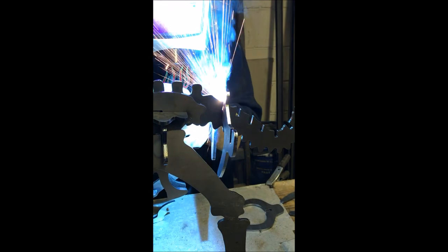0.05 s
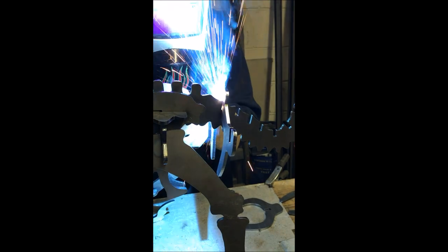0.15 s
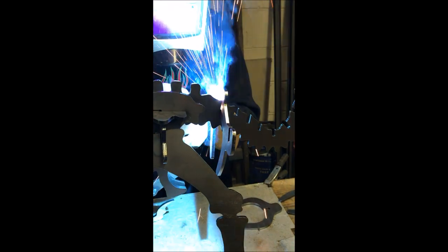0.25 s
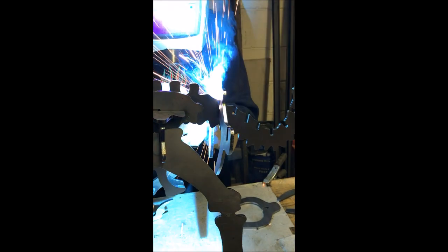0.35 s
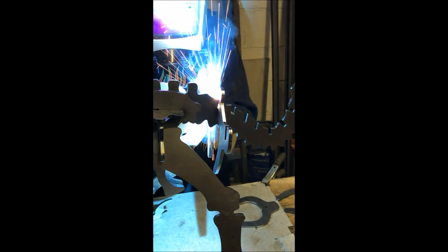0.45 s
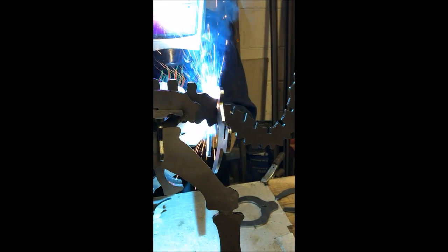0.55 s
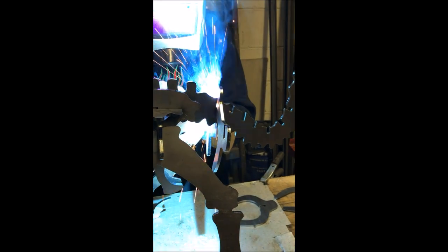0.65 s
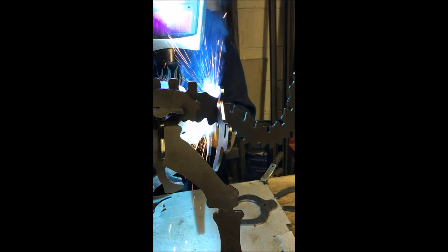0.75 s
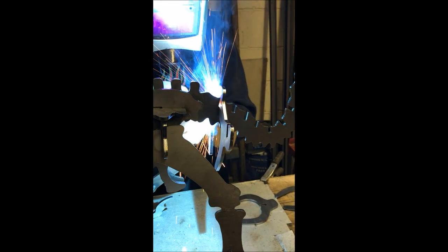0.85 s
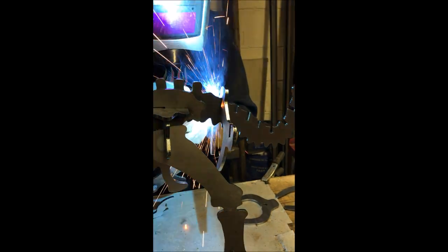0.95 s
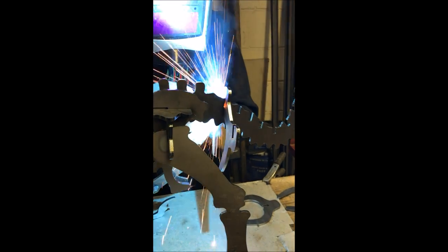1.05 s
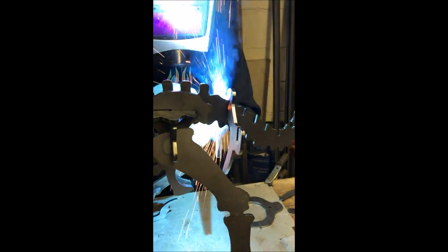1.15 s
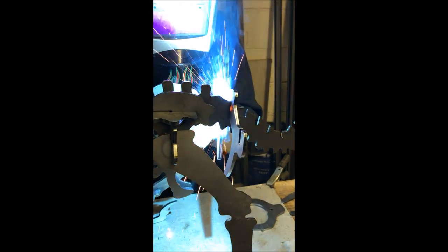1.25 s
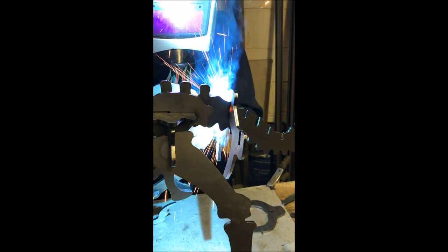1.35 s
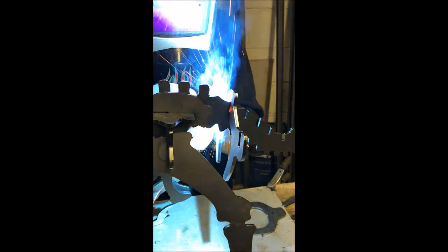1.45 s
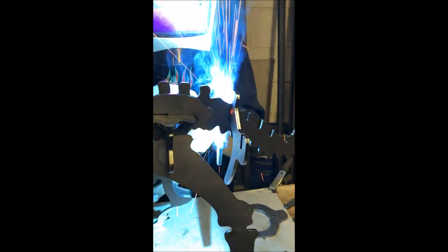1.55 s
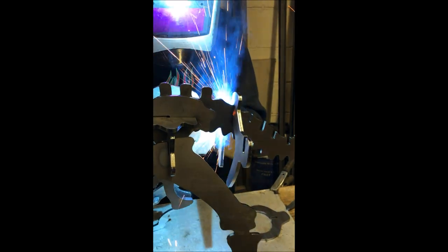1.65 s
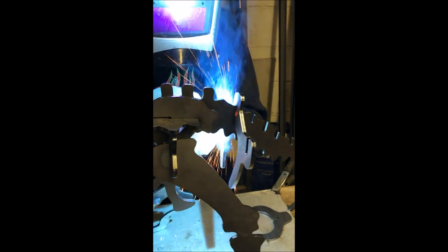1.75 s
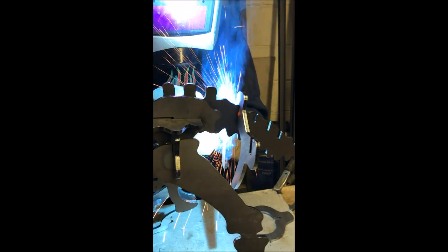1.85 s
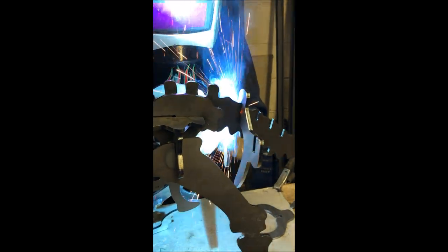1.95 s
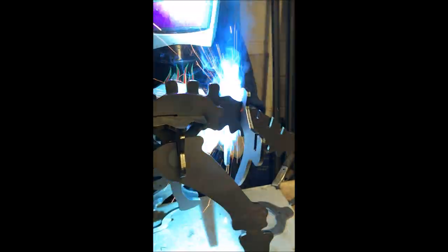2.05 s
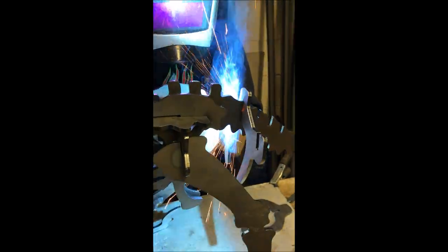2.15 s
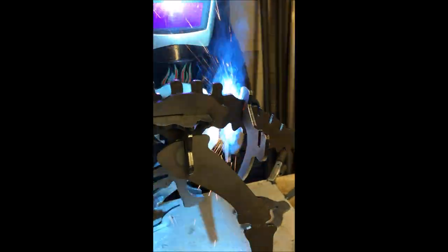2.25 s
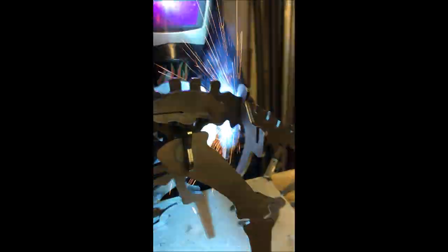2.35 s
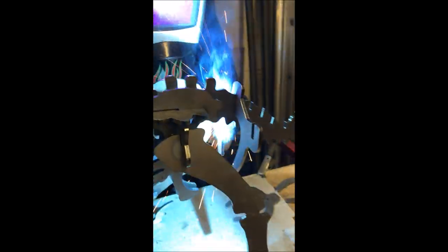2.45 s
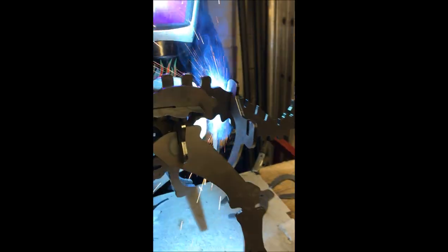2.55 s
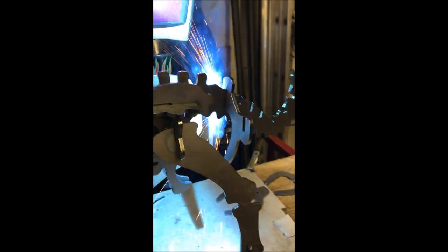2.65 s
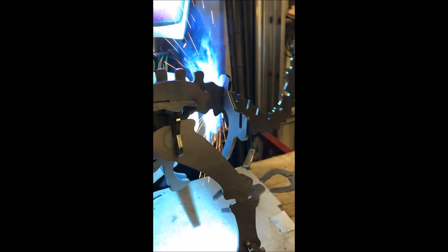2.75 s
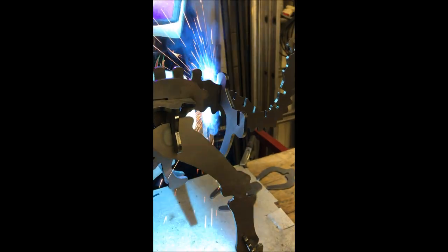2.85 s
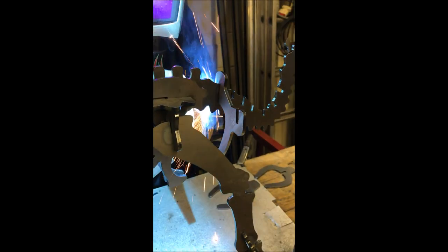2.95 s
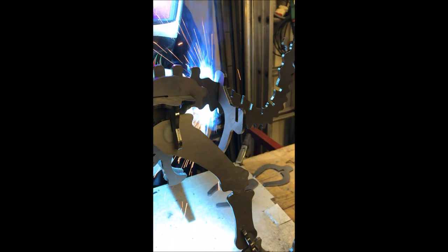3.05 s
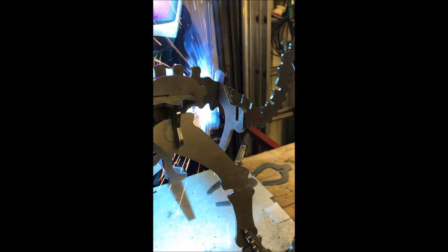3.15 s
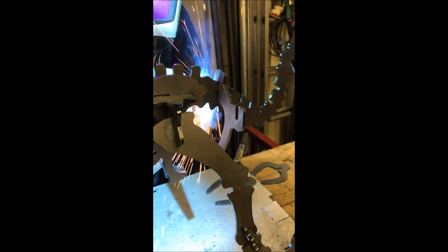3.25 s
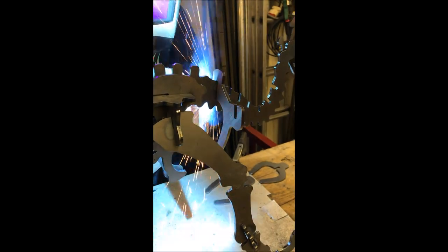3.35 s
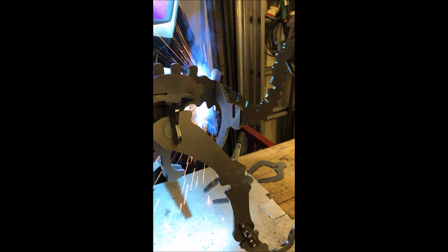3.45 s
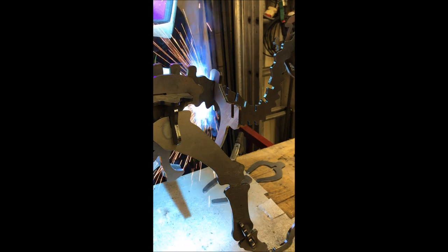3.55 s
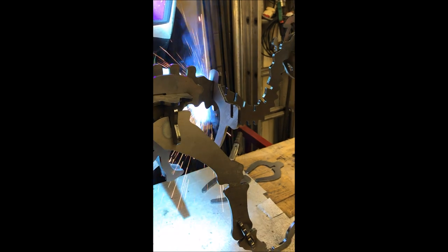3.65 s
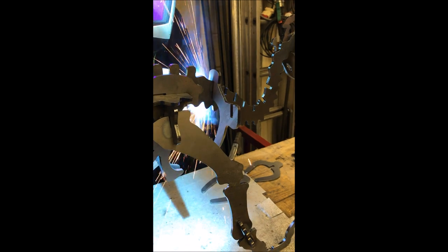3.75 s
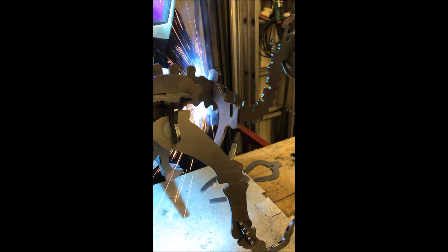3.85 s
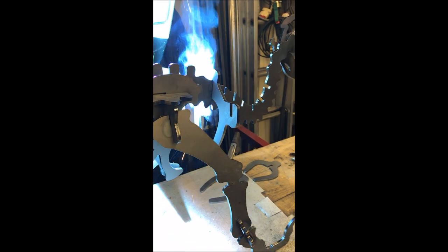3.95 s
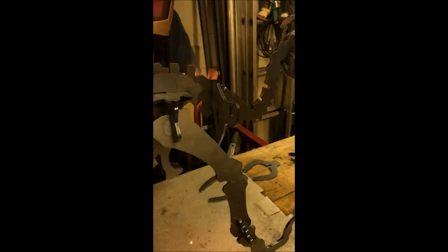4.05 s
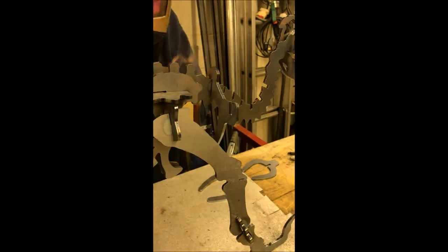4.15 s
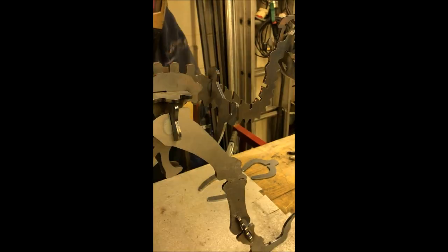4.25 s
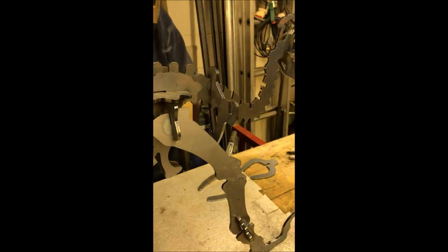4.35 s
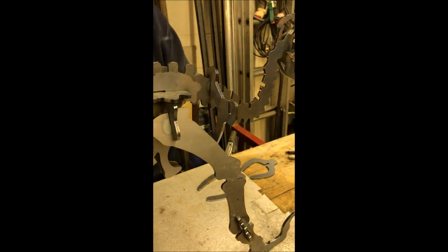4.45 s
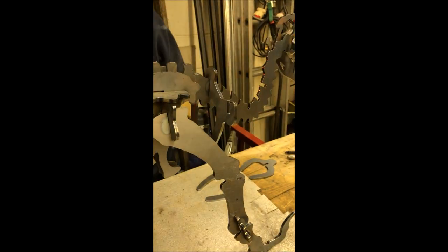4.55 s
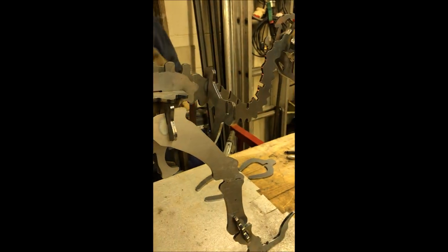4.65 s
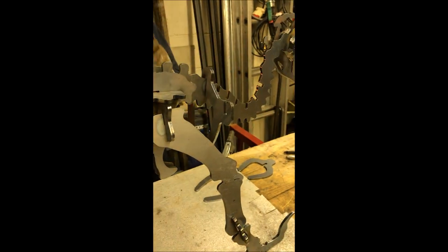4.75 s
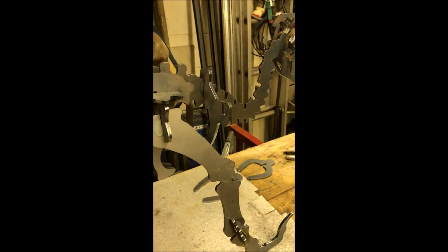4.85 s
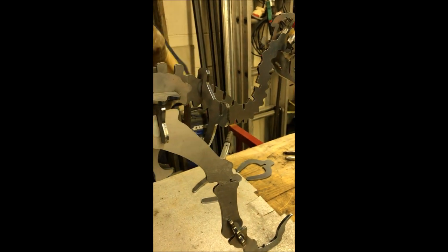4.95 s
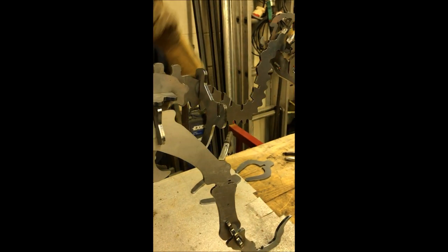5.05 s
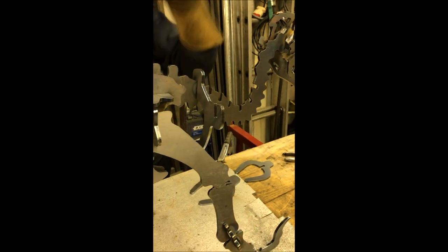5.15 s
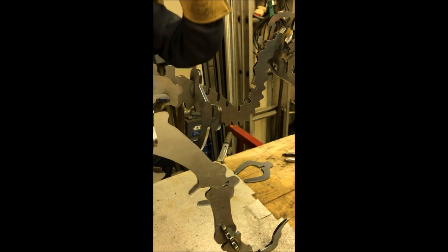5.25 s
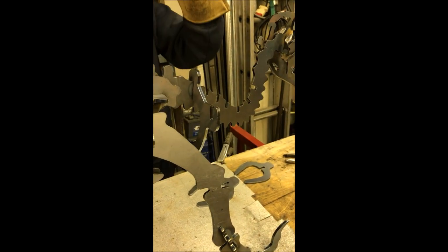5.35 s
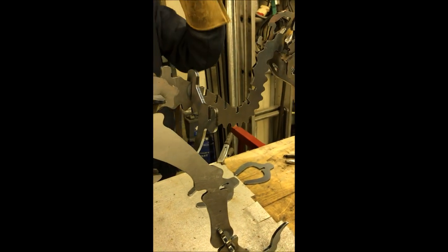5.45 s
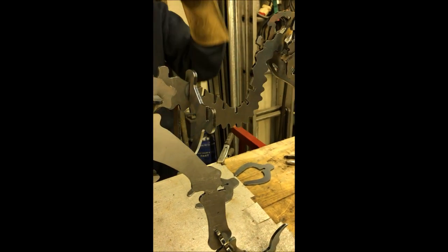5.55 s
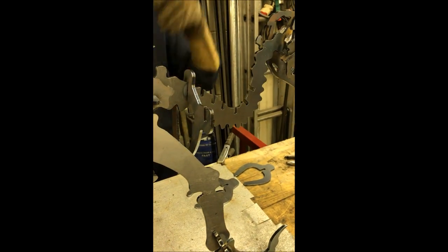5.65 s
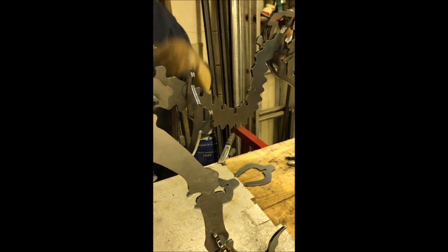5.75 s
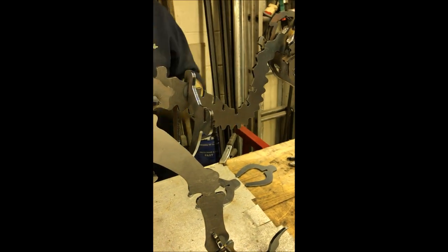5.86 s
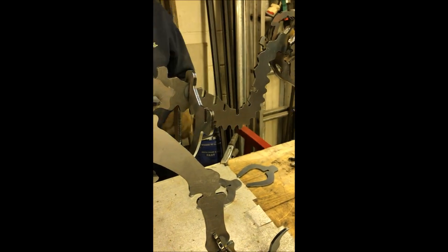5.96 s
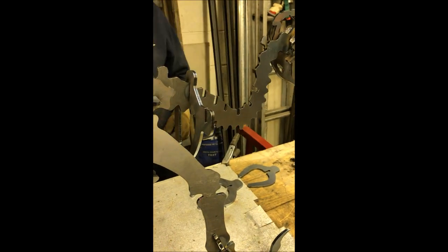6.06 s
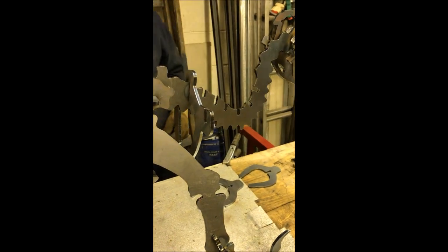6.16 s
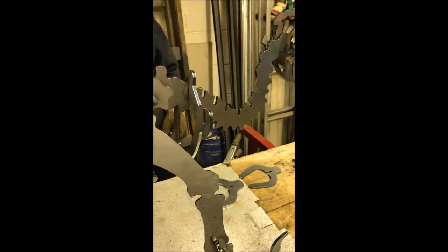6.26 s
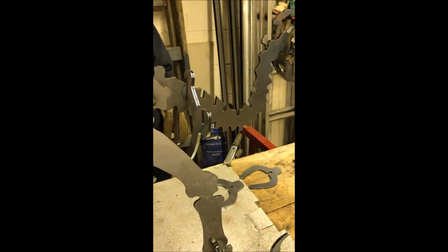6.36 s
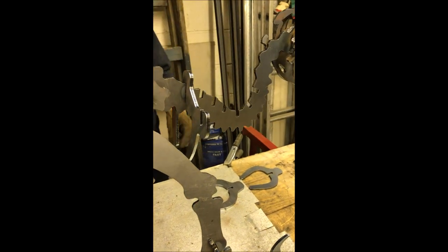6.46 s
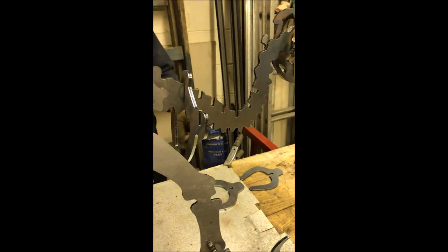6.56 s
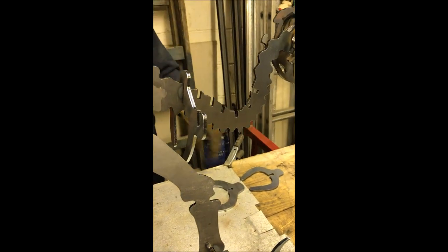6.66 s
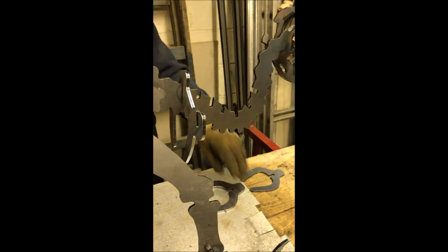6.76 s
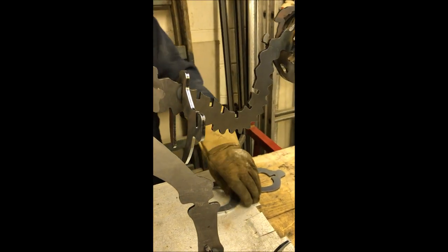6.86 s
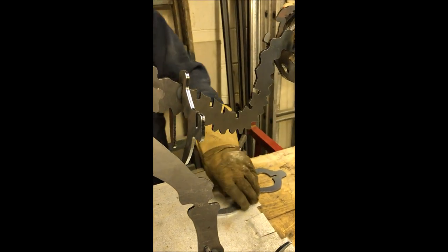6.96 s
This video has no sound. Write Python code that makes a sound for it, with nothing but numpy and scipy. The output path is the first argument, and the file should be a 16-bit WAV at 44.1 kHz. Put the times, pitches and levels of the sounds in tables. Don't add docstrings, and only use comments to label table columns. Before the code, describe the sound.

Loud, buzzing, sputtering arc weld on steel in a small workshop cuts off abruptly, then faint rustling, ratchety helmet clicks and a final knock.

```python
import sys
import numpy as np
from scipy import signal
from scipy.fft import rfft, irfft, dct, next_fast_len
from scipy.io import wavfile
from scipy.ndimage import uniform_filter1d

SR = 44100
rng = np.random.default_rng(int(sys.argv[2]) if len(sys.argv) > 2 else 0)


def to_wav(sig):
    pcm = np.clip(np.atleast_2d(sig), -1, 1) * 32767
    pcm = np.round(pcm).astype(np.int16)
    wavfile.write(sys.argv[1], SR, pcm.T)


def nominal_scale(level):
    x = np.asarray(level, float) / 20
    return 10 ** x


N = 308459

# f/Hz, density/dB per Hz
SHOP_SPECTRUM = [(240, -33.5), (400, -5.5), (921, -5.5), (1310, -12.5), (1560, -15.5), (7510, -34.5),
                 (12300, -24.5), (16000, -34)]
SHOP_DB = -62.5
# f/Hz, width/Hz, level/dB
FAN_BANDS = [(59, 8, -58), (78, 14, -56.5), (104.8, 14, -65), (188, 21, -53), (255, 81, -65.5),
             (335, 29, -60)]
# f/Hz, T60/s
ROOM_T60 = [(200, .6), (1000, 0.35), (4000, 0.35), (9000, .35), (15000, .25)]
# t/s, level/dB, top octave re level/dB
RUSTLE_CURVE = [(4.2, -53, -10), (4.35, -62, -6), (4.48, -60, -6), (4.54, -57.5, -10), (4.61, -59, -7),
                (4.66, -75, -6.5), (4.9, -72, -4), (4.94, -67, -3), (5.1, -69, -6), (5.14, -62, -13),
                (5.2, -66, -12), (5.45, -62.5, -8), (5.55, -77.5, -3.5), (6.88, -80, -6), (6.92, -65, -8),
                (6.972, -63.5, -8), (6.982, -51, -5), (6.987, -36, -9), (6.995, -37, -6)]
# t/s, level/dB
SQUEAK_CURVE = [
    (4.37, -78),
    (4.38, -56),
    (4.42, -56),
    (4.44, -68),
    (4.47, -80),
]
# f/Hz, width/Hz, level/dB
SQUEAK_BANDS = [(2900, 300, -2), (4370, 250, 3), (8000, 900, -3), (13400, 900, 1)]
# t/s, peak/dB, shell re peak/dB
HINGE_NOTCHES = [(5.2126, -47, -2), (5.2407, -41, 0), (5.2485, -35.5, -9), (5.2877, -42, -2.5),
                 (5.2964, -43.5, -1), (5.3173, -40.5, -11), (5.3277, -38, -7), (5.3667, -34, -4),
                 (5.4023, -30, -11), (5.435, -37.5, -14.5), (6.9481, -50, 3.5), (6.9834, -31.5, -8),
                 (6.9884, -29, -2)]
# f/Hz, level/dB, T60/s
SHELL_MODES = [(378, 2, 0.052), (633, -1, .04), (806, 2, 0.048), (1000, -1.5, 0.045)]
# f/Hz, level/dB, T60/s
PAWL_MODES = [(1436, -4, .012), (2225, 1, .012), (2890, -1.5, 0.015), (3600, -2, .01), (4280, -3, 0.0089),
              (5400, -5, 0.0062)]
# t/s, peak/dB
COOLING_TICKS = [
    (4.93, -71.5),
    (5.49, -69.5),
    (6.41, -72),
    (6.607, -72),
    (6.74, -69.5),
]
# f/Hz, level/dB, T60/s
STEEL_MODES = [(4500, -3, .12), (6100, 1, 0.27), (7900, 0, .1), (8300, 0, 0.23), (10200, -1, 0.104),
               (13000, -2, 0.11)]
# f/Hz, width/Hz, level/dB
HUM_BANDS = [(99, 7, -52.5), (198.6, 6, -45), (301, 6.4, -57), (665.5, 29, -43.5)]
# t/s, frying level/dB, hot-air thud level/dB
ARC_CURVE = [
    (0.0, -25, -41.5),
    (0.55, -28, -43),
    (1.25, -26.5, -50.5),
    (1.37, -25.5, -42),
    (3.58, -27.5, -56.5),
    (3.65, -27.5, -35),
    (4.07, -26, -53),
]
# f/Hz, density/dB per Hz
FRYING_SPECTRUM = [(120, -33.5), (200, -3.5), (360, -7), (1500, -3), (2290, -20), (2910, -6), (10500, -7.5),
                   (11700, -4.5), (16000, -7.5)]
RIPPLE_HZ = 99.9
# t/s, peak/dB
RESTRIKES = [(0.0049, -1), (0.0257, -4), (0.0359, -3), (0.0463, -2), (0.0493, 0), (0.0564, -3), (0.067, -2),
             (0.0773, 0), (0.081, -5), (0.089, -6), (0.0976, -4), (0.1159, -3), (0.127, -2.5), (0.1483, -8),
             (0.1567, -2), (0.1679, 2), (0.1767, -2.5), (0.1864, 2), (0.1987, -11.5), (0.2066, -3.5),
             (0.2178, 0), (0.2299, -4), (0.2572, -1.5), (0.2677, 1), (0.2752, -4), (0.2996, -4),
             (0.3065, -2.5), (0.3178, 1.5), (0.3277, -3.5), (0.3362, -3), (0.3474, -2), (0.358, -1),
             (0.367, -1.5), (0.3894, 3.5), (0.3947, -8), (0.4182, -6), (0.4286, -2), (0.4367, -1),
             (0.4475, 1.5), (0.4573, -5.5), (0.4665, -2), (0.4803, 4), (0.5079, -2), (0.5191, -4.5),
             (0.5272, 3), (0.5371, -2), (0.5475, -7.5), (0.5576, -6), (0.5681, 5), (0.5777, -6),
             (0.5871, -15), (0.5968, -7), (0.6073, 1.5), (0.6172, -9), (0.6264, -4), (0.6369, -3),
             (0.6471, -9), (0.6563, -10), (0.6671, -2), (0.6773, -6), (0.6856, -6), (0.6971, -2),
             (0.7076, -2), (0.7174, -4), (0.7275, -6), (0.7385, -0.5), (0.7475, -9), (0.7567, -4),
             (0.7674, -7), (0.778, -12), (0.7972, 0.5), (0.8086, -1), (0.8168, -7), (0.8271, 0),
             (0.8384, 1), (0.8483, -1), (0.8575, -2), (0.8686, -2), (0.8782, 0), (0.8884, -5), (0.9181, -2),
             (0.9667, 0.5), (0.9784, -3), (0.9884, -1), (0.9983, -2), (1.0094, -9), (1.0186, -7),
             (1.0268, 2), (1.0402, -10), (1.0509, -4), (1.0582, 6), (1.0777, -5), (1.1005, 0), (1.1076, 2),
             (1.1185, -2), (1.1503, 0), (1.1595, -0.5), (1.1686, -3), (1.1982, -7), (1.2085, 1),
             (1.2185, -1), (1.2403, -2), (1.2583, 2), (1.2778, -1.5), (1.2983, -11), (1.3097, -4),
             (1.3189, -8), (1.3289, -4), (1.3388, -4.5), (1.3571, -2), (1.3797, -8), (1.39, 1), (1.3999, 0),
             (1.4077, -2), (1.4183, -5), (1.4287, -4), (1.4486, -2), (1.4712, 3), (1.4982, -1),
             (1.5086, -7), (1.5183, -2), (1.5287, -9), (1.5482, -3), (1.5696, 1), (1.5807, -3), (1.5987, 3),
             (1.6084, -9), (1.618, -8), (1.6297, -2), (1.6389, -4), (1.6482, -9), (1.6606, 0), (1.6702, -6),
             (1.6863, 4.5), (1.699, -4), (1.7077, -2), (1.7187, -4), (1.7293, 0), (1.7397, -5),
             (1.7495, -4), (1.759, -0.5), (1.769, 0), (1.779, -6), (1.783, -5), (1.7891, -2), (1.8079, -3),
             (1.8195, 3), (1.8283, -6), (1.8394, -1), (1.8499, -5), (1.9016, -2), (1.909, -5),
             (1.9194, 0.5), (1.9293, -6), (1.9484, -2), (1.9594, -5), (1.9796, -3), (1.9901, 0),
             (1.9985, -5), (2.011, 0), (2.0398, 1), (2.0508, -1), (2.0588, 0), (2.0784, -6), (2.0828, -6),
             (2.089, 1), (2.0993, -7), (2.1106, -1), (2.1177, -1), (2.1215, -8), (2.1294, -4), (2.1409, -6),
             (2.1529, -7), (2.1628, 0), (2.1761, -12), (2.1787, 0), (2.2008, -7), (2.2163, -4),
             (2.2317, -3), (2.2404, 2), (2.2506, -4), (2.2601, -3), (2.2709, -1), (2.2823, -4),
             (2.2908, -6), (2.3012, -1), (2.304, -5), (2.3094, 1), (2.3182, -3), (2.3298, 1), (2.3408, -9),
             (2.3504, 1.5), (2.3805, -3), (2.4071, -5.5), (2.4297, -5), (2.4415, -3), (2.4691, -11),
             (2.4795, 0), (2.4906, -7), (2.5008, -7), (2.5114, 1), (2.5205, -1), (2.5684, -4), (2.5782, -4),
             (2.5891, -6), (2.5993, -5), (2.6081, -4), (2.6112, -5), (2.6196, 1), (2.6304, -3),
             (2.6395, -5.5), (2.6595, -3), (2.684, -1), (2.6896, -1), (2.7011, -3), (2.7091, -1),
             (2.7295, -3), (2.7793, -2), (2.7992, -3.5), (2.81, 1), (2.8207, -8), (2.8313, -4),
             (2.8418, -3), (2.8779, 0.5), (2.901, -0.5), (2.9106, 0), (2.9207, -1), (2.9407, -10),
             (2.9517, 1), (2.9605, -3), (2.9704, -3), (2.9799, -14), (2.9995, 0), (3.0095, 0.5), (3.02, -7),
             (3.0303, -7), (3.041, 2), (3.0505, -10), (3.0606, -5), (3.0707, -2), (3.0808, -2),
             (3.0908, -5), (3.1002, 1), (3.1044, -12), (3.1196, -11), (3.1236, 4), (3.1303, 0),
             (3.1392, -2), (3.1441, -8), (3.159, -3), (3.1696, -2), (3.1906, -3), (3.1993, -6),
             (3.2098, -5), (3.2197, 0), (3.2297, -7), (3.24, -4.5), (3.2503, -3), (3.2801, -5.5),
             (3.2902, -7), (3.3, 2.5), (3.3199, -8), (3.3241, 0.5), (3.3315, -4), (3.3411, -3.5),
             (3.3514, -2), (3.3618, -2), (3.3712, -4), (3.3811, -5), (3.3912, 1), (3.4098, -3.5),
             (3.4137, -7), (3.4205, -1.5), (3.4312, -3), (3.451, -3), (3.4614, -6), (3.471, -2),
             (3.4811, -6), (3.502, -3), (3.5115, -4), (3.5312, -7), (3.5408, -5), (3.5513, -1.5),
             (3.5613, 0.5), (3.5648, -3), (3.5713, -7), (3.6113, -4.5), (3.621, -2), (3.6447, -9),
             (3.6515, -12.5), (3.662, 2), (3.6718, -3), (3.6819, 3), (3.701, 1), (3.7109, -4), (3.7221, -2),
             (3.7303, -15), (3.7407, -4), (3.7516, -2.5), (3.7606, -5), (3.7709, -12), (3.7814, -9),
             (3.7914, -1), (3.8023, -9), (3.8095, -5), (3.8204, -4.5), (3.8302, -12), (3.8412, -4.5),
             (3.8511, -8), (3.8606, -9), (3.8812, -4.5), (3.8909, -7.5), (3.9018, 4), (3.9249, -6),
             (3.9379, -5), (3.9526, -1), (3.9618, 2), (3.9725, -2), (3.9815, -6), (3.991, -4), (4.0435, -4),
             (4.0563, -4)]
SPATTER_COUNT = 90
TORCH_S = [0, 2.2, 4.05]
# delay/ms at start, middle, end; level/dB at start, middle, end
PLATE_ECHOES = [(.34, .34, .32, -26, -5, -7), (.55, .54, 0.55, -21.5, -8, -17),
                (.66, 0.6325, .59, -11, -9.5, -2), (.71, .68, .63, -6.5, 1, -16),
                (.79, 0.774, .70, -3, -4, 3), (.95, 0.9215, .85, -15.5, -14, -3.5),
                (1.11, 0.86, 0.92, -18.5, -16.5, -27), (1.42, 1.3466, 1.29, -7.5, -3.5, -1),
                (1.46, 1.47, 1.3, -14, -11, -13), (2.05, 2.2, 1.9, -15, -17, -11),
                (2.6, 2.8, 2.7, -21, -19.5, -19)]
# f/Hz, width/Hz, gain/dB
PORT_BANDS = [(11720, 900, 4), (13100, 900, 3.5), (10340, 900, -5), (15800, 600, 3)]
# t/s, share of bands lost, length/s
THIN_FRAMES = [(0.048, .5, 0.035), (0.239, 0.48, 0.043), (0.282, 0.23, 0.048), (0.407, 0.29, 0.032),
               (.9, 0.48, 0.035), (1.435, 0.3, 0.046), (1.602, 0.49, 0.049), (1.799, 0.5, 0.041),
               (1.875, 0.62, 0.047), (1.967, 0.36, .04), (2.03, 0.31, 0.046), (2.358, 0.3, .03),
               (2.395, 0.55, 0.067), (2.65, 0.39, 0.032), (2.762, 0.64, 0.023), (3.176, 0.59, .03),
               (3.333, 0.31, 0.037), (3.441, 0.45, 0.04), (3.584, 0.54, 0.022), (3.645, 0.24, 0.077),
               (3.704, 0.23, 0.052), (3.907, .4, 0.037), (4.014, 0.3, .04), (4.445, 0.39, 0.031),
               (4.87, 0.54, 0.034), (5.339, 0.55, 0.038), (5.53, 0.28, 0.036), (5.618, .5, 0.041),
               (6.129, .3, 0.038), (6.21, 0.29, .04), (6.335, 0.35, .035), (6.83, .55, 0.039),
               (6.895, 0.4, .04)]


def rms_one(x):
    return x / np.sqrt(np.mean(x ** 2) + 1e-20)


def in_time(rows):
    s, *columns = np.transpose(rows)
    t = np.arange(N) / SR
    return [np.interp(t, s, column) for column in columns]


def at_hz(points, hz):
    table_hz, values = np.transpose(points)
    return np.interp(np.log(hz + 1), np.log(table_hz), values)


def coloured(spectrum):
    size = next_fast_len(N)
    hz = np.arange(size // 2 + 1) * SR / size
    white = rfft(rng.standard_normal(size))
    return rms_one(irfft(white * nominal_scale(at_hz(spectrum, hz)), size)[:N])


def drift(rate_hz):
    r = np.exp(-2 * np.pi * rate_hz / SR)
    wander = signal.lfilter([1], [1, -2 * r, r * r], rng.standard_normal(N + SR))
    return rms_one(wander[SR:])


def resonant(bands):
    out = np.zeros(N)
    for hz, width_hz, level_db in bands:
        r = np.exp(-np.pi * width_hz / SR)
        poles = [1, -2 * r * np.cos(2 * np.pi * hz / SR), r * r]
        band = signal.lfilter([1, 0, -1], poles, rng.standard_normal(N))
        out += nominal_scale(level_db) * rms_one(band)
    return out


def struck(times_s, peaks_db, modes, spread_db):
    out = np.zeros(N)
    at = (np.array(times_s) * SR).astype(int)
    strengths = nominal_scale(spread_db * rng.standard_normal((len(at), len(modes))))
    for k, (hz, level_db, t60_s) in enumerate(modes):
        clicks = np.full(N, 1e-18)
        clicks[at] = nominal_scale(np.array(peaks_db) + level_db) * strengths[:, k]
        r, w = nominal_scale(-60 / (t60_s * SR)), 2 * np.pi * hz / SR
        out += signal.lfilter([0, np.sin(w)], [1, -2 * r * np.cos(w), r * r], clicks)
    return out


def shop_and_fan():
    return nominal_scale(SHOP_DB) * coloured(SHOP_SPECTRUM) + resonant(FAN_BANDS)


def workshop(x, gap_s=0.0044):
    age_s, tail = np.arange(SR) / SR, 0
    for low_hz in 62.5 * 2 ** np.arange(8):
        octave = signal.butter(2, [low_hz, 2 * low_hz], "band", fs=SR, output="sos")
        band = signal.sosfilt(octave, rng.standard_normal(SR))
        tail = tail + band * nominal_scale(-60 * age_s / at_hz(ROOM_T60, np.sqrt(2) * low_hz))
    tail = tail * np.clip(age_s / gap_s, 0, 1) ** 2
    return signal.fftconvolve(x, tail / np.sqrt(np.sum(tail ** 2)))[:N]


def rustle():
    level_db, top_db = in_time(RUSTLE_CURVE)
    cloth = coloured([(500, -11), (1200, 0.5), (3000, -1.5), (7000, -8), (9000, -20)])
    top = coloured([(6000, -20), (8000, 6), (16000, -4.0)])
    after_arc = np.arange(N) / SR > RUSTLE_CURVE[0][0]
    return nominal_scale(level_db + 1.9 * drift(40)) * (cloth + nominal_scale(top_db) * top) * after_arc


def valve_squeak():
    t = np.arange(N) / SR
    closing = (t > SQUEAK_CURVE[0][0]) * (t < SQUEAK_CURVE[-1][0])
    return nominal_scale(in_time(SQUEAK_CURVE)[0]) * resonant(SQUEAK_BANDS) * closing


def helmet_hinge():
    s, peak_db, shell_db = np.transpose(HINGE_NOTCHES)
    pawl = struck(s, peak_db - 9, PAWL_MODES, 3.2)
    return pawl + struck(s + 0.0018, peak_db + shell_db - 5.5, SHELL_MODES, 3.6)


def cooling_steel():
    return struck(*np.transpose(COOLING_TICKS), STEEL_MODES, 5.8)


def burning():
    return np.clip((ARC_CURVE[-1][0] - np.arange(N) / SR) / .004, 0, 1)


def thud_and_hum():
    thud_db = in_time(ARC_CURVE)[1]
    air = coloured([(15, -12), (50, -2.5), (100, -2.5), (160, -6.5), (400, -23.5)])
    thud = nominal_scale(thud_db + 3.0 + 5.0 * drift(16)) * air
    return burning() * (thud + resonant(HUM_BANDS))


def frying(ripple_db=3.5, ripple_lag_cycles=.3):
    t = np.arange(N) / SR
    ripple = ripple_db * np.cos(2 * np.pi * (RIPPLE_HZ * t - ripple_lag_cycles))
    level_db = in_time(ARC_CURVE)[0] + ripple + 4.6 * drift(150)
    return burning() * nominal_scale(level_db) * coloured(FRYING_SPECTRUM)


def pops(blast_db=7.0, suction=.4, suction_hz=2300, damping=0.56, scatter_db=-13, scatter_s=0.0019, size=512):
    spatter = rng.random((SPATTER_COUNT, 2)) * [RESTRIKES[-1][0], -5.0] + [0, -8]
    s, peak_db = np.concatenate([RESTRIKES, spatter]).T
    luck = rng.standard_normal((len(s), len(PLATE_ECHOES) + 1))
    jw = 2j * np.pi * np.arange(size // 2 + 1) * SR / size
    w0 = 2 * np.pi * suction_hz * np.exp(0.15 * luck[:, :1])
    blast = 1 - suction * 2 * w0 ** 2 / (jw ** 2 + 2 * damping * w0 * jw + w0 ** 2)

    paths = np.ones_like(blast)
    for k, plate in enumerate(PLATE_ECHOES):
        delay_s = np.interp(s, TORCH_S, plate[:3]) / 1000
        gain = nominal_scale(np.interp(s, TORCH_S, plate[3:]) + 1.2 * luck[:, k + 1])
        paths += gain[:, None] * np.exp(-jw * delay_s[:, None])

    age_s = np.arange(size) / SR
    scatter_shape = age_s / scatter_s * np.exp(-(age_s / scatter_s) ** 2)
    clutter = nominal_scale(scatter_db) * rng.standard_normal((len(s), size)) * scatter_shape
    shapes = nominal_scale(peak_db + blast_db)[:, None] * irfft(blast * (paths + rfft(clutter)), size)
    out = np.zeros(N + size)
    np.add.at(out, (s * SR).astype(int)[:, None] + np.arange(size), shapes)
    return out[:N]


def scene():
    near = pops() + frying() + rustle() + valve_squeak() + helmet_hinge() + cooling_steel()
    return (near + nominal_scale(-10.5) * workshop(near) + thud_and_hum() + shop_and_fan())[None]


def microphone_port(x):
    for hz, width_hz, gain_db in PORT_BANDS:
        a, w = nominal_scale(gain_db / 2), 2 * np.pi * hz / SR
        k = np.sin(w) * width_hz / hz / 2
        zeros = [1 + k * a, -2 * np.cos(w), 1 - k * a]
        poles = [1 + k / a, -2 * np.cos(w), 1 - k / a]
        x = signal.lfilter(zeros, poles, x)
    return x


def thin_frames(x, width=12, tilt=.7, keep=0.69):
    out = x.copy()
    for s, share, length_s in THIN_FRAMES:
        size = 2 * int(length_s * SR / 2)
        at = max(int(s * SR) - size // 2, 0)
        window = np.sin(np.pi / 2 * np.sin(np.pi * np.arange(size) / size) ** 2)
        frame = window * x[at:at + size]
        lines = dct(frame, norm="ortho")
        hz = np.arange(size) * SR / size / 2
        band = (hz / (width * SR / 2048)).astype(int)
        level = np.sqrt(np.bincount(band, lines ** 2) / np.bincount(band) + 1e-20)
        log_level = np.log(level)
        rank = (log_level - tilt * uniform_filter1d(log_level, size=15))[:60]
        strong = rank > np.quantile(rank, np.clip(share, 0, 1))
        alive = np.append(strong, np.zeros(len(level), bool))
        lines = lines * alive[band] * (np.abs(lines) > keep * level[band])
        out[at:at + size] += window * (dct(lines, type=3, norm="ortho") - frame)
    return out


def low_pass(x):
    return signal.sosfilt(signal.butter(12, 17100, fs=SR, output="sos"), x)


def record(dry):
    bass_cut = signal.butter(2, 45, "high", fs=SR, output="sos")
    top_cut = signal.ellip(10, .5, 70, 15800, fs=SR, output="sos")
    x = microphone_port(signal.sosfilt(bass_cut, dry[0]))
    x = 1.347 * np.tanh(x / 1.286)
    x = thin_frames(signal.sosfilt(top_cut, x))
    return low_pass(np.clip(x, -1, 1)[None])


dry = scene()
out = record(dry)
to_wav(out)
```